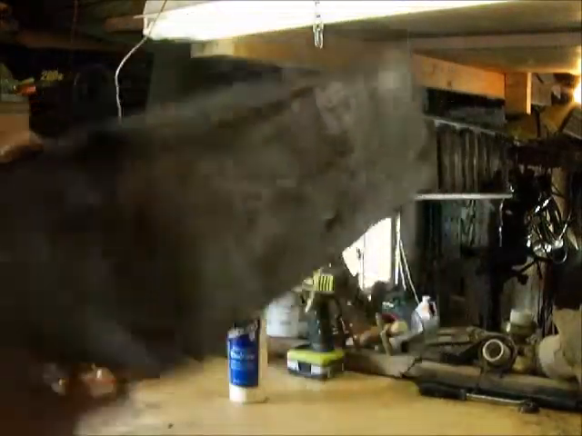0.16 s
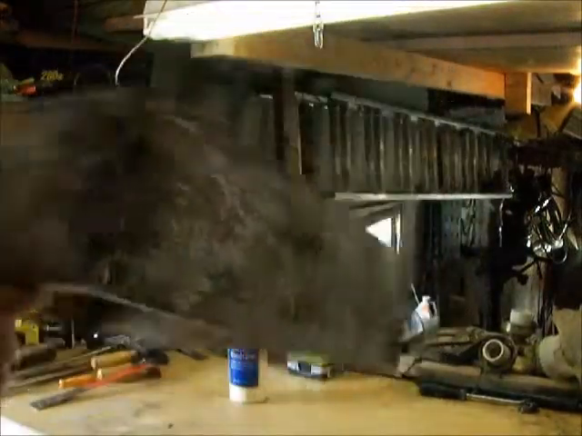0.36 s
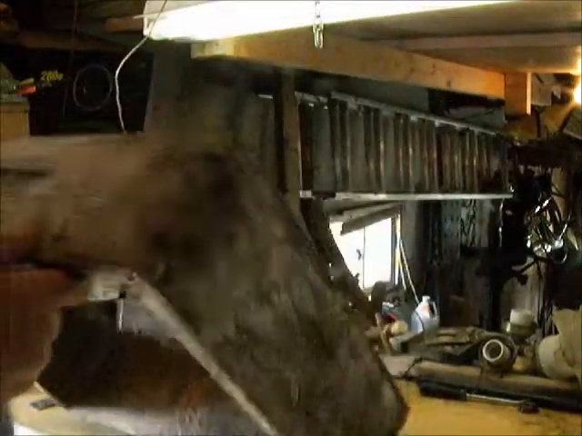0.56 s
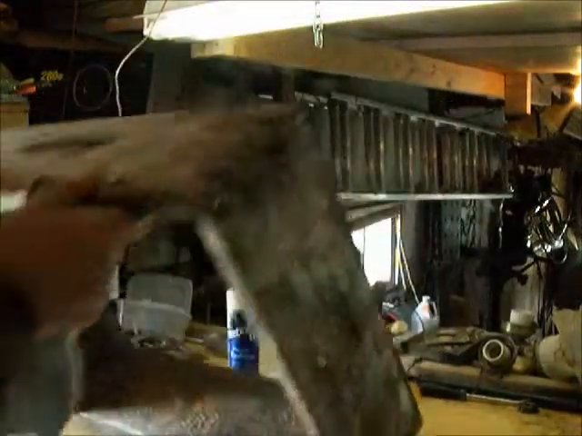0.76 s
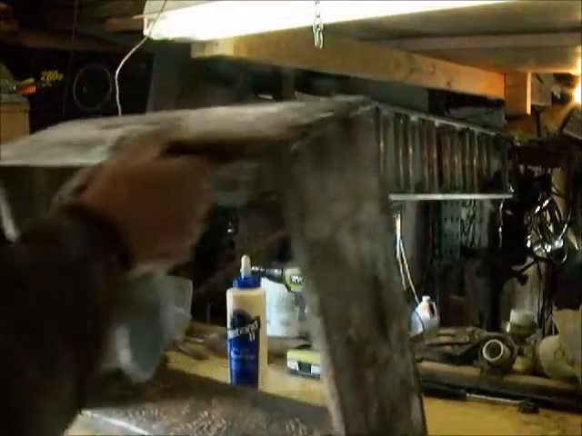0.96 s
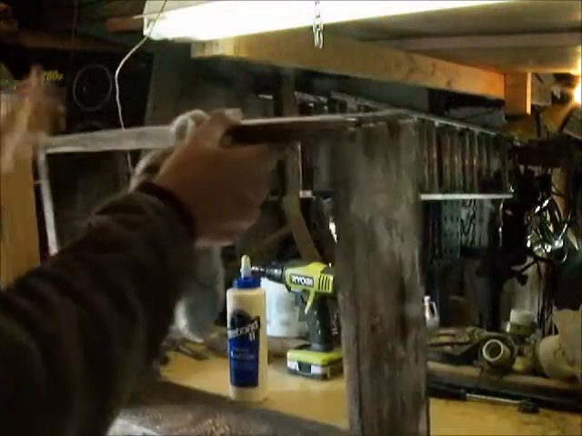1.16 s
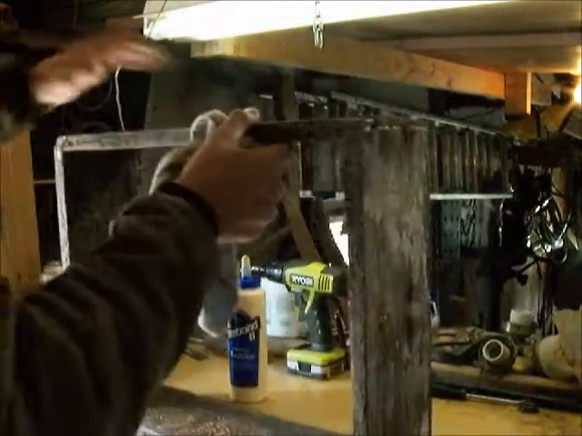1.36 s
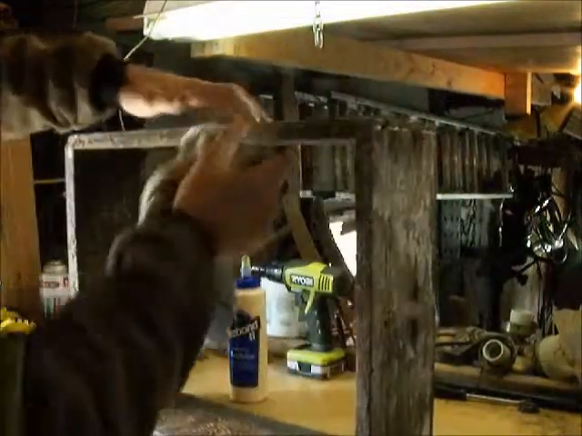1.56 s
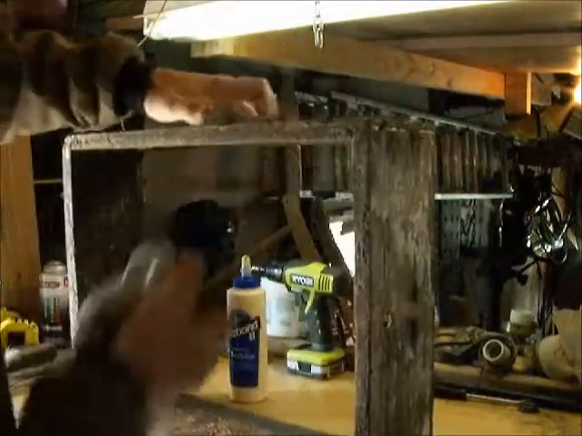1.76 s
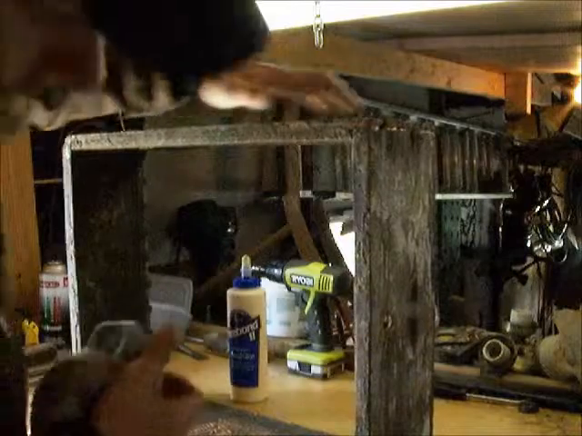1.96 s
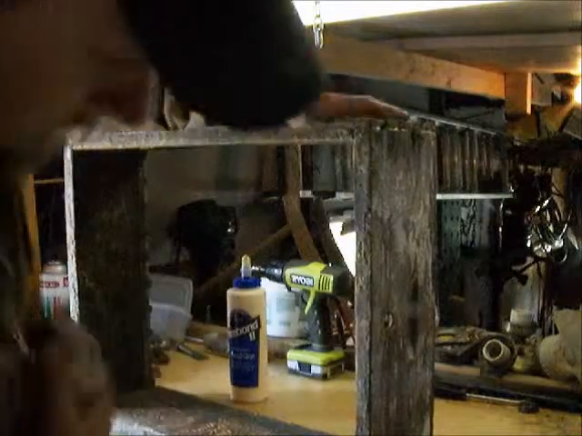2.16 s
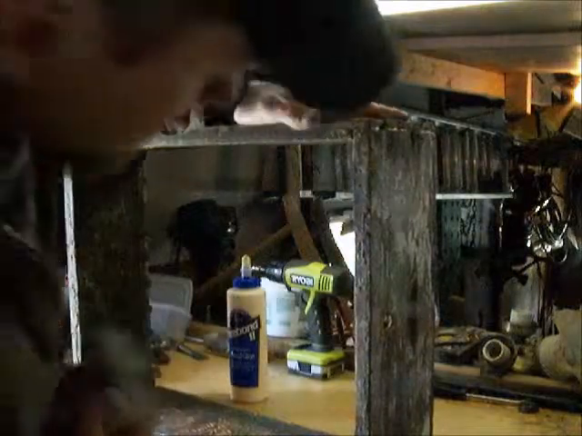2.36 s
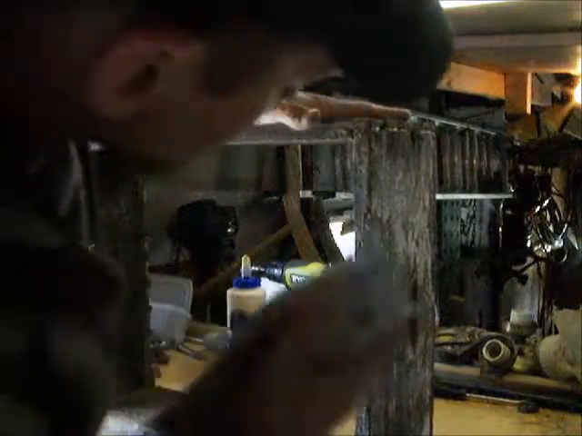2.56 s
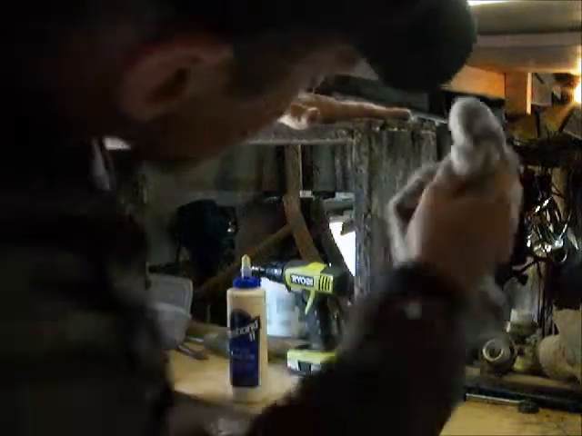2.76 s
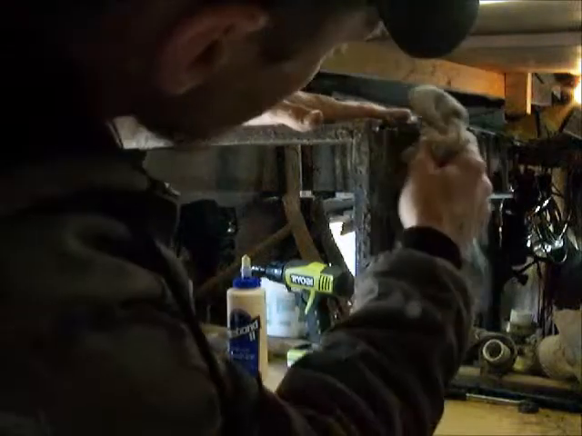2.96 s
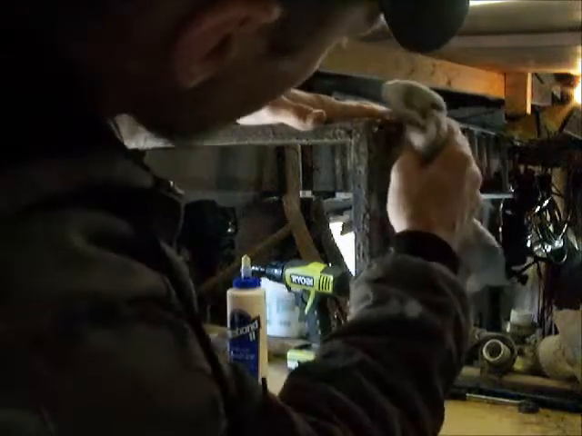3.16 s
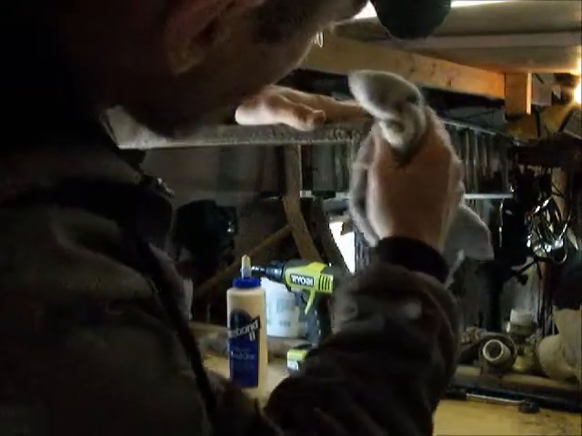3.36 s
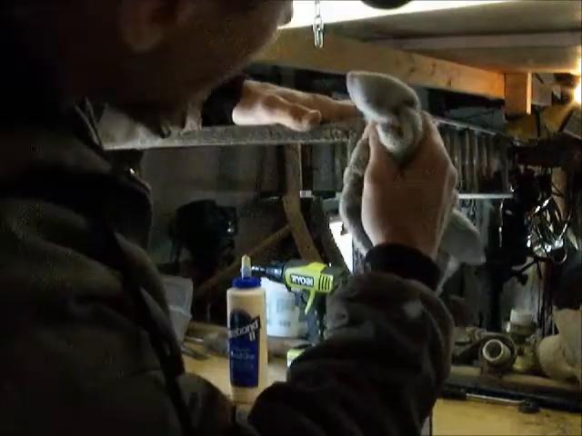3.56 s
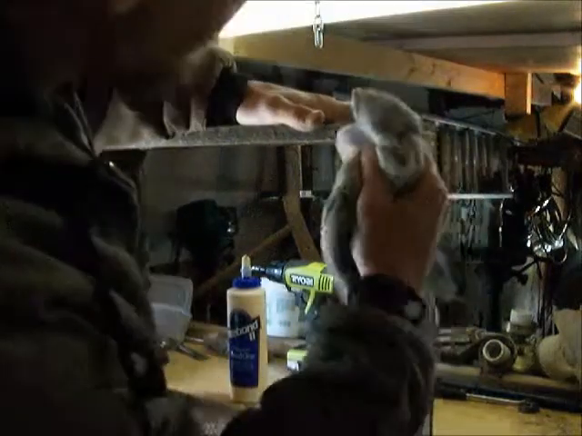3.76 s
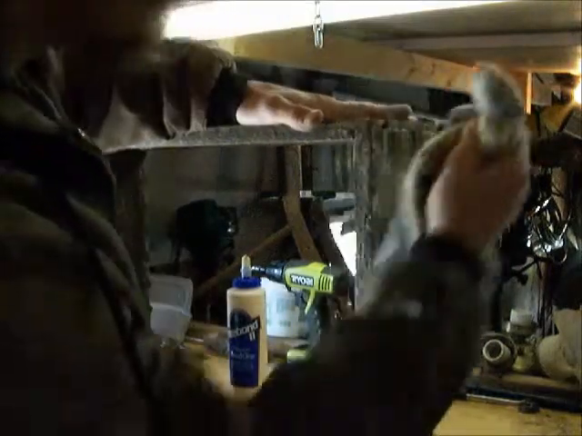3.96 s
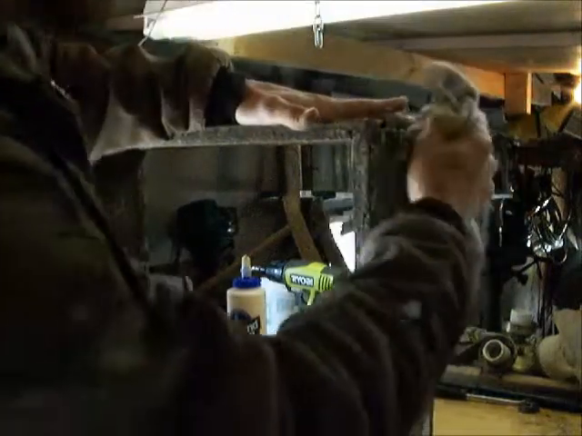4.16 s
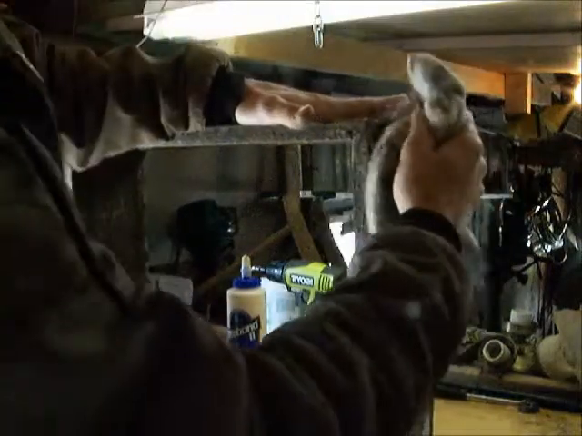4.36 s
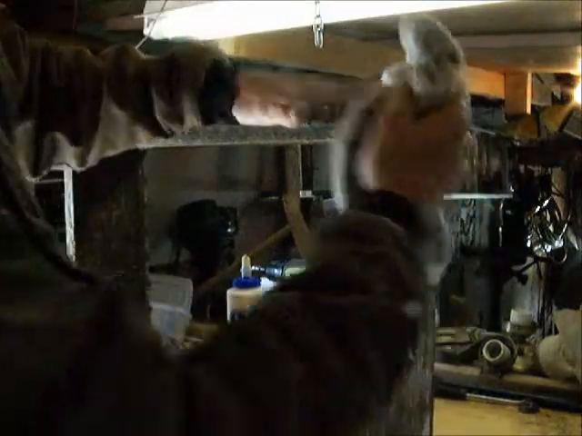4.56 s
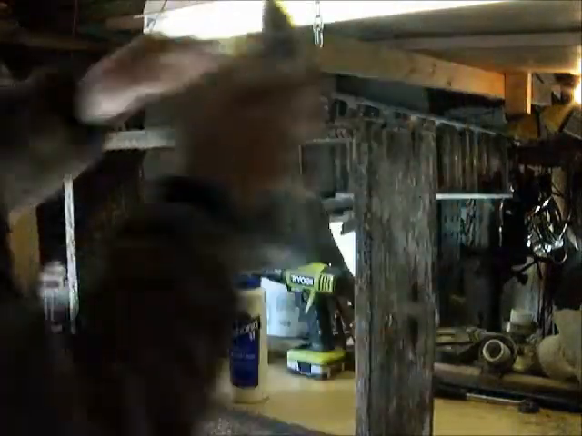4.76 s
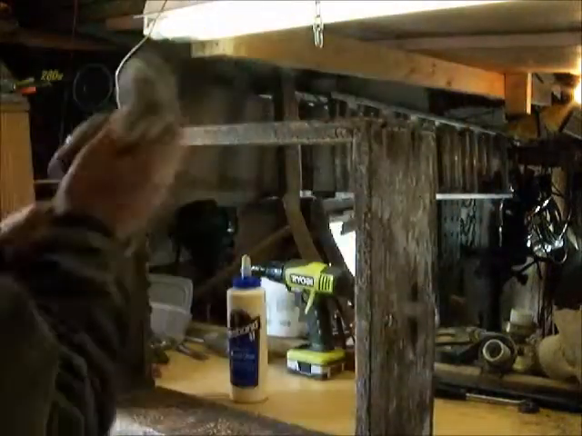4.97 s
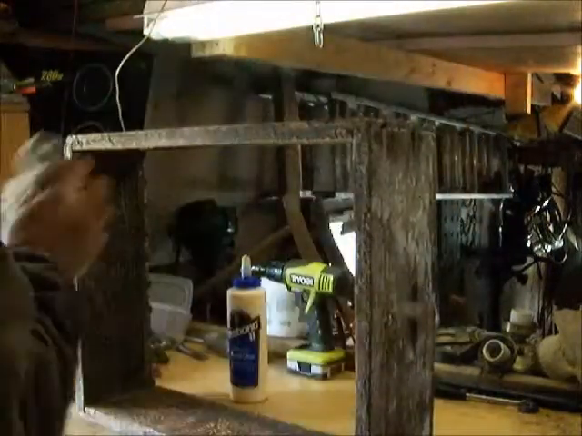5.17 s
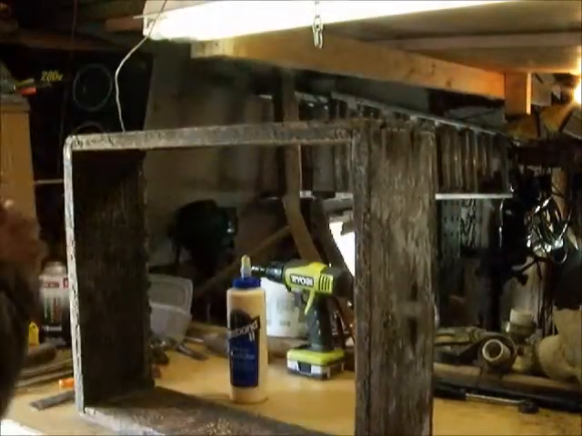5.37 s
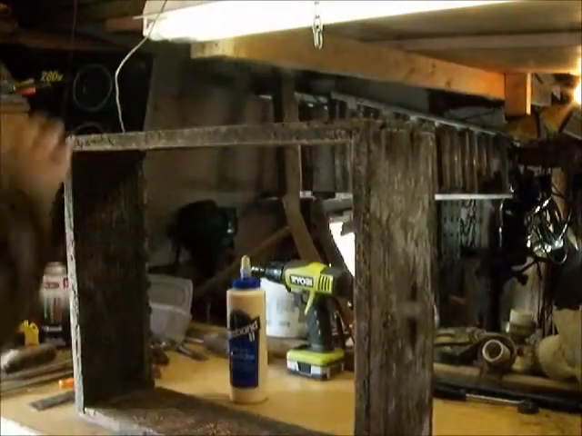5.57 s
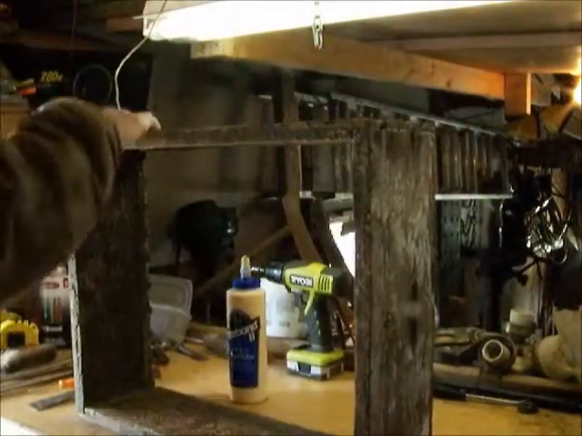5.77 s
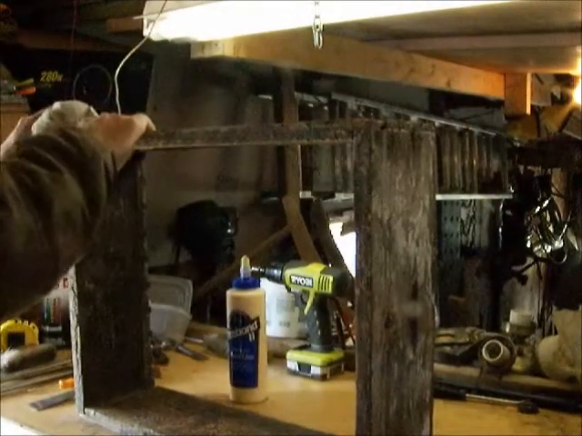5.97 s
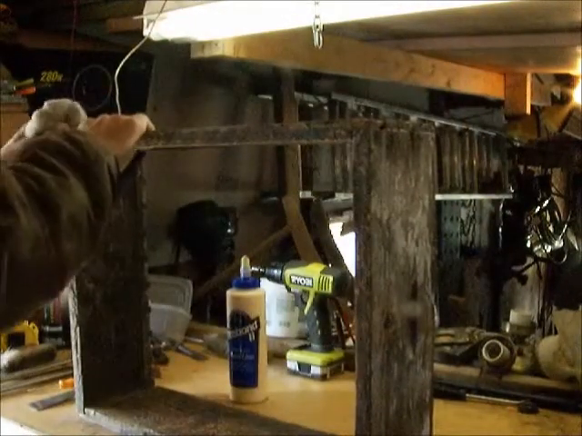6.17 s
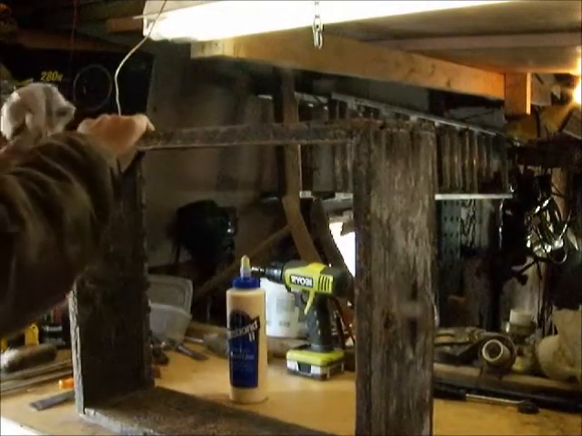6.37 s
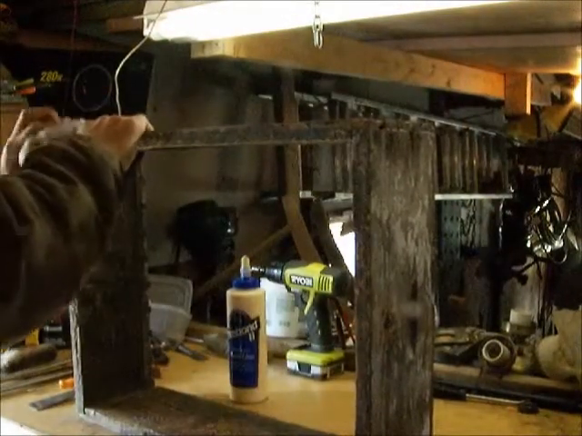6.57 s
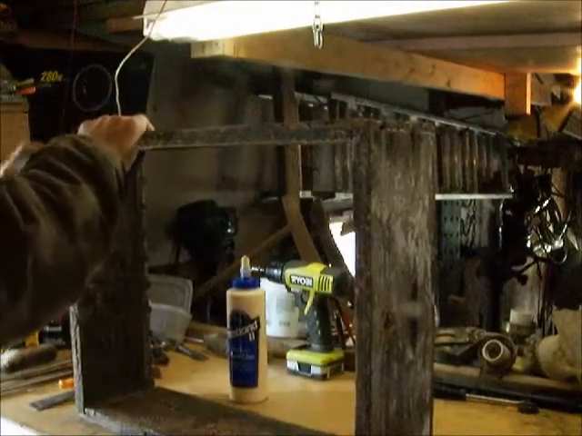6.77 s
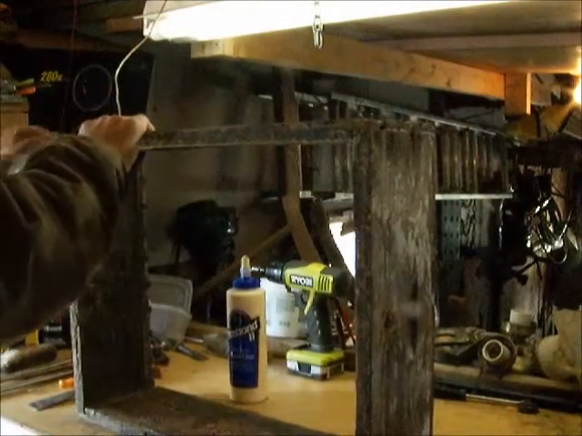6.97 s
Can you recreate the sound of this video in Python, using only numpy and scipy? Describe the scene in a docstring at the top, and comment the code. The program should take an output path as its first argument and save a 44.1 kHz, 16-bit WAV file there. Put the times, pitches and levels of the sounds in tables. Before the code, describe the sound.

Heavy knock of a weathered wood box set down on a bench, followed by dry rag wiping, small knocks, splinter ticks and quiet whirring.

```python
"""Motor chatter at the left and a brushing cloth over a garage hum; at 0.5 s a box of weathered boards
lands on a workbench. A rag then wipes its joints: random fibre catches hiss and rasp through filters, slips
squeak as wavering sines. Knocks ring box and bench modes; splinters tick and scuff as resonated clicks.
The focus motor is whine plus gear clicks in its housing; hum is sines over shaped noise.
Gain control ducks after the heavy landing and slowly comes back."""
import sys
import numpy as np
from scipy import signal
from scipy.fft import rfft, irfft, next_fast_len
from scipy.io import wavfile
from scipy.ndimage import uniform_filter1d

SR = 44100
rng = np.random.default_rng(int(sys.argv[2]) if len(sys.argv) > 2 else 0)


def master(y):
    """Save y as 16-bit WAV."""
    cut = np.clip(np.atleast_2d(y).T, -1, 1)
    pcm = np.round(cut * 32767)  # scale
    wavfile.write(sys.argv[1], SR, pcm.astype(np.int16))


N = 309185
TIME = np.arange(N) / SR

# All source levels are relative unless noted.
# Rag wipes, pressed and drawn along a joint: start t/s, end t/s, strength/dB, rasp/dB, edge bite/dB
WIPES = [(0.376, 0.393, -31.5, 7, -2.5), (0.419, 0.471, -31.5, 13, -5), (1.47, 1.493, -31.5, -2, -1),
         (2.902, 2.969, -25.5, 0.5, -8.5), (3.161, 3.277, -19, -2.5, -9.5), (3.332, 3.367, -33.5, 2, -2),
         (3.507, 3.522, -19, 1, -6.5), (3.538, 3.643, -30.5, 2.5, -9.5), (3.843, 3.978, -30, 0.5, -6.5),
         (4.106, 4.196, -29, 1, -7.5), (4.247, 4.33, -31.5, 1.5, -11), (5.919, 6.059, -31, 0.5, -4),
         (6.519, 6.656, -33, 0, -7.5)]
# Loose cloth swept by the arm: fastest at t/s, speeding up/s, slowing down/s, strength/dB, rasp/dB
SWEEPS = [(0.07, 0.21, .17, -31.5, 3), (0.678, 0.058, 0.21, -32.5, 3), (1.381, .05, 0.036, -43.5, 2),
          (1.6, 0.13, 0.1, -36.5, -4), (2.04, 0.15, 0.17, -31.5, -2.5), (2.468, 0.08, 0.046, -30, 0.5),
          (2.648, 0.099, 0.086, -25.5, 2.5), (4.531, 0.089, 0.1, -26.5, -1), (4.951, 0.21, 0.15, -32, 4),
          (5.4, 0.14, 0.31, -34, 4.5), (6.798, 0.11, 0.071, -45.5, 11)]
# Fibre hiss spectrum: f/Hz, density/dB
HISS_SPECTRUM = [(300, -37.5), (1000, -35.5), (1800, -7), (2700, -4.5), (4000, 3.5), (5300, 7), (6200, 0.5),
                 (7300, -8), (8200, -36.5)]
# Board rasp spectrum: f/Hz, density/dB
RASP_SPECTRUM = [(80, 4), (160, 7), (300, 6.5), (450, 4), (700, 3.5), (1000, 3.5), (1500, -2), (2400, -5.5),
                 (4000, -46.5)]
# Board grain resonances under the rag: f/Hz, width/Hz, level/dB
GRAIN_MODES = [(2660, 55, -9), (2980, 45, -6), (3490, 35, -2), (6320, 75, -12)]
# Panel shaken by the rag: f/Hz, width/Hz, level/dB
PANEL_MODES = [(172, 33, 0.5), (271.7, 6.2, 15), (360, 42, -3.5), (393, 7.5, 2.5), (412, 68, -5),
               (1005, 38, 4.5)]
# Rag squeaks: start t/s, end t/s, f/Hz, level/dB
SQUEAKS = [(2.845, 2.885, 4550, -33), (5.915, 6.015, 2025, -38.5)]
# Blows on the box: t/s, level/dB, contact bandwidth/Hz, passed on to the bench/dB
BLOWS = [(0.4857, -3.5, 430, -11.5), (0.4933, -15, 800, -22), (0.511, -10.5, 716, -8), (0.532, -17, 445, 2),
         (0.634, -12.5, 75, 4), (0.71, -16.5, 65, 6), (1.474, -27.5, 506, 9), (1.702, -28.5, 195, 1),
         (1.92, -30, 218, 0), (2.03, -25, 109, -14), (4.263, -29.5, 400, -13), (5.053, -27, 426, 6),
         (5.137, -33, 607, -4), (5.679, -23.5, 265, 4), (5.695, -13, 207, -7)]
# Box modes: f/Hz, level/dB, t60/s
BOX_MODES = [(88.6, -10, 0.29), (119, 2, 0.093), (158.5, -12.5, 0.44), (174.2, -7, 0.26),
             (212.2, -9.5, 0.31), (238.7, -20.5, 0.35), (267, -15, 0.24), (294.4, -21, 0.17),
             (333.6, -10.5, 0.19), (356.7, -12.5, 0.22), (398.7, -11.5, 0.17), (430.4, -7, 0.12),
             (486, -15, .18), (538, -15, 0.25), (603, -13, 0.1), (833, -25.5, 0.23), (853, -22.5, 0.055),
             (1026, -10, 0.027)]
# Workbench modes: f/Hz, level/dB, t60/s
BENCH_MODES = [(35.6, -9, 0.61), (52.9, -10, 0.33), (66.5, -3, 0.19)]
# Splinter ticks: t/s, level/dB
TICKS = [(0.4676, -7.5), (0.6518, -26.5), (0.7373, -25), (0.813, -28), (1.454, -30.5), (2.325, -31.5),
         (3.1252, -26.5), (3.137, -28), (4.1955, -27), (4.706, -22), (6.132, -38), (6.377, -30.5),
         (6.699, -36), (6.78, -38), (6.8498, -31), (6.98, -39)]
# Splinter resonances: f/Hz, width/Hz, level/dB
SPLINTER_MODES = [(1980, 2100, -3), (3300, 2170, 3), (4430, 1470, 8.5), (5600, 500, 10), (6800, 320, -2)]
# Scuffs on rough edges: t/s, level/dB, t60/s, passed into the board/dB
SCUFFS = [(0.461, -28, 0.3, 9), (0.469, -6, 0.0076, -17), (0.487, -14, 0.046, 9.5), (4.246, -25, 0.056, 0),
          (4.257, -6.5, 0.051, -1), (4.265, -17.5, 0.035, -11), (4.282, -25, 0.36, -0.5),
          (5.676, -24, 0.078, 6.5), (5.726, -23.5, 0.078, 0.5), (6.036, -43, 0.035, 6),
          (6.052, -34, 0.076, 6), (6.648, -23.5, 0.047, 0.5)]
# Rough edge resonances: f/Hz, width/Hz, level/dB
EDGE_MODES = [(2886, 100, -4), (4610, 1400, -3), (5420, 800, 3), (6960, 570, -10.5)]
# Resonances of the board behind the edge: f/Hz, width/Hz, level/dB
BOARD_MODES = [(1007, 28, 1), (1593, 300, -9), (2500, 990, -5), (3600, 1700, -10)]
# Focus motor runs: start t/s, end t/s, level/dB
FOCUS_RUNS = [(0.008, 0.039, -34), (0.062, 0.087, -31.5), (0.105, 0.117, -29), (0.221, 0.28, -33.5),
              (0.309, 0.375, -30), (1.119, 1.143, -41), (1.283, 1.284, -39), (1.861, 1.926, -37),
              (2.035, 2.139, -39), (2.519, 2.57, -31), (2.689, 2.699, -27), (2.741, 2.82, -34),
              (3.242, 3.354, -34), (3.451, 3.539, -36), (3.664, 3.699, -33), (3.724, 3.811, -32),
              (3.855, 3.955, -31.5), (3.993, 4.103, -35), (4.235, 4.246, -34.5), (4.418, 4.471, -32),
              (4.826, 4.858, -33.5), (4.938, 4.992, -31.5), (5.045, 5.15, -33), (5.399, 5.446, -35),
              (5.543, 5.631, -33.5), (5.868, 5.882, -30.5), (5.922, 5.993, -35.5), (6.042, 6.055, -30.5),
              (6.163, 6.19, -36.5), (6.302, 6.337, -33), (6.413, 6.47, -30), (6.5, 6.622, -34),
              (6.78, 6.8, -37.5), (6.944, 6.972, -28)]
# Motor housing resonances: f/Hz, width/Hz, level/dB
HOUSING_MODES = [(545.4, 64, -1), (652.5, 82, -2), (706, 97, -5.5), (855, 121, -5.5), (1076, 130, -17),
                 (1225, 110, -14.5), (1690, 55, -15.5), (2010, 48, -16), (2156, 91, -17)]
# Motor whine partials: f/Hz, level/dB
MOTOR_WHINE = [(635, -2.5), (834, -11.5), (1270, -18.5), (2110, -25.5)]
# Machine hum partials: f/Hz, median rms level/dB
HUM = [(91.5, -46), (118.4, -48.5), (180, -64)]
# Garage air spectrum: f/Hz, density/dB
AIR_SPECTRUM = [(20, -1), (45, -1), (70, 0.5), (105, -3), (150, -9.5), (250, -13.5), (450, -19), (900, -23),
                (1300, -21), (2500, -26), (7500, -36.5)]
# Left-right correlation of the air: f/Hz, correlation/1
AIR_CORRELATION = [(60, 0.76), (130, 0.52), (350, 0.79), (800, 0.13), (2500, 0.033)]
# Muffling of the left microphone: f/Hz, gain/dB
LEFT_PORT = [(100, -4), (300, -1), (600, 0.5), (1200, 1.5), (2200, -15), (3500, -25), (5500, -22.5),
             (8000, -16)]

WIPE_ATTACK_S, WIPE_RELEASE_S = 0.019, 0.022
PRESS_DB_PER_S = 4.5  # the hand leans in as it goes
HOLD_DB, HOLD_RASP_DB = -45.5, -1  # rag shifting in the resting hand
LOOSE_BITE_DB = -10  # edge bite of loose cloth
REBOUND_S, REBOUND_LOSS_DB, REBOUND_MAX_DB = 0.06, 6, -27
SCUFF_ATTACK_S = 0.0024
SURGE_PERIOD_S, SURGE_DEPTH_DB, SETTLE_S = 0.027, 3.5, 0.025
TWITCH_GAP_S, TWITCH_S = 0.065, 0.022  # mean start spacing, mean length
TWITCH_MAX_DB, TWITCH_SPREAD_DB = -35, 2.0
GARAGE_T60_S = 0.34
CUTOFF_HZ = 7900


def from_db(db):
    """Decibels to amplitude gain."""
    return 10 ** (np.asarray(db) / 20)


def rms_one(x):
    """Scale to unit rms."""
    return x / np.sqrt(np.mean(x ** 2) + 1e-20)


def per_bin(points):
    """Interpolate a table over log frequency at every Fourier bin."""
    hz, value = np.transpose(points)
    bins_hz = np.fft.rfftfreq(next_fast_len(N), 1 / SR)
    return np.interp(np.log(bins_hz + 1), np.log(hz), value)


def shape(x, gain):
    """Filter by a gain per Fourier bin."""
    size = next_fast_len(N)
    return irfft(rfft(x, size) * gain, size)[..., :N]


def colour(x, spectrum):
    """Filter by a table of f/Hz, gain/dB."""
    return shape(x, from_db(per_bin(spectrum)))


def drift(rate_hz):
    """Random drift, rms 1: noise through two equal poles at rate_hz, run at SR / 20."""
    r = np.exp(-40 * np.pi * rate_hz / SR)
    noise = rng.standard_normal(N // 20 + 3002)
    slow = signal.lfilter([1], [1, -2 * r, r * r], noise)[3000:]  # drop the settling
    return np.interp(np.arange(N) / 20, np.arange(len(slow)), rms_one(slow))


def resonate(x, modes):
    """Parallel two-pole resonances (f/Hz, width/Hz, level/dB) of alternating sign."""
    out = 0
    for k, (hz, width_hz, db) in enumerate(modes):
        r = np.exp(-np.pi * width_hz / SR)
        poles = [1, -2 * r * np.cos(2 * np.pi * hz / SR), r * r]
        gain = (-1) ** k * from_db(db) * (1 - r * r) / 2
        out = out + gain * signal.lfilter([1, 0, -1], poles, x + 1e-18)
    return out


def ring(pushes, modes, scatter_db):
    """Every push excites every decaying mode (f/Hz, level/dB, t60/s) with its own random strength."""
    strengths = from_db(scatter_db * rng.standard_normal((len(pushes), len(modes))))
    out = 0
    for k, (force, (hz, db, t60_s)) in enumerate(zip(strengths.T @ pushes, modes)):
        r = np.exp(-np.log(1000) / (t60_s * SR))
        w = 2 * np.pi * hz / SR
        poles = [1, -2 * r * np.cos(w), r * r]
        out = out + (-1) ** k * from_db(db) * signal.lfilter([0, np.sin(w)], poles, force + 1e-18)
    return out


def dying(start_s, t60_s):
    """Envelope that jumps to 1 and decays exponentially."""
    age_s = TIME - start_s
    return (age_s >= 0) * np.exp(-np.log(1000) * np.clip(age_s / t60_s, 0, 10))


def catches(per_s, spread_db):
    """Fibres catch and let go: random clicks of uneven size and sign, rms 1."""
    sizes = from_db(spread_db * np.minimum(rng.exponential(1, N), 5)) * rng.choice([-1, 1], N)
    hits = rng.random(N) < per_s / SR
    return rms_one(sizes * hits / np.sqrt(per_s))  # density leaves the power unchanged


def rag():
    """A firmer stroke catches more fibres; they hiss, and shake the boards under them."""
    stroke_db, rough_db, bite_db = cloth_contact()
    per_s = 7000 * from_db(0.5 * (stroke_db + 30.5))
    grip = from_db(1.1 * drift(20))  # the rough surface makes the pressure flutter
    fibres = catches(per_s, spread_db=1.0)
    hiss = rms_one(colour(fibres, HISS_SPECTRUM) + resonate(fibres, GRAIN_MODES))
    edge_catches = catches(per_s / 3, spread_db=2.5)
    bite = from_db(bite_db) * rms_one(resonate(edge_catches, [(2400, 2800, -8.5), (3100, 1170, -2.5)]))
    rasp_db = -43 + 0.75 * (stroke_db + 29) + rough_db  # less steep than the hiss
    tugs = catches(per_s, spread_db=3.5)
    rasp = rms_one(colour(tugs, RASP_SPECTRUM) + from_db(0.5) * resonate(tugs, PANEL_MODES))
    return grip * (from_db(stroke_db - 3.5) * (hiss + bite) + from_db(rasp_db) * rasp)


def cloth_contact():
    """Movements add in power, which also weights rasp and bite; returns strength, rasp, bite in dB."""
    gains, rasp_db, bite_db = map(np.array, zip(*strokes()))
    power = gains ** 2
    total = power.sum(axis=0)
    return 10 * np.log10(total), rasp_db @ power / total, bite_db @ power / total


def strokes():
    """Cloth movements (gain, rasp/dB, bite/dB): wipes grip, hold and let go; sweeps swell and fade."""
    moves = [(from_db(HOLD_DB) * np.ones(N), HOLD_RASP_DB, LOOSE_BITE_DB)]
    for start_s, end_s, db, rasp_db, bite_db in WIPES:
        onset = np.minimum(TIME - start_s, 0) / WIPE_ATTACK_S
        release = np.maximum(TIME - end_s, 0) / WIPE_RELEASE_S
        contact = np.exp(onset - release)
        press_db = PRESS_DB_PER_S * (np.clip(TIME, start_s, end_s) - (start_s + end_s) / 2)
        moves.append((from_db(db + press_db) * contact, rasp_db, bite_db))
    for fastest_s, rise_s, fall_s, db, rasp_db in SWEEPS:
        away = (TIME - fastest_s) / np.where(TIME < fastest_s, rise_s, fall_s)
        swell = np.exp(-np.minimum(away ** 2 / 2, 20))
        moves.append((from_db(db) * swell, rasp_db, LOOSE_BITE_DB))
    return moves


def squeaks():
    """The cloth sticks and slips: sines of wavering pitch and level."""
    out = 0
    for start_s, end_s, hz, db in SQUEAKS:
        progress = np.clip((TIME - start_s) / (end_s - start_s), 0, 1)
        swell = np.sqrt(np.abs(np.sin(np.pi * progress)))
        level = from_db(db + 3 * drift(60))
        phase = 2 * np.pi * np.cumsum(hz + 30 * drift(120)) / SR
        out = out + level * swell * np.sin(phase)
    return out


def blows():
    """Soft pushes ring box and bench; harder contacts reach higher modes, and the box rocks back once."""
    rebounds = [(s + REBOUND_S, min(db - REBOUND_LOSS_DB, REBOUND_MAX_DB), hz, bench_db)
                for s, db, hz, bench_db in BLOWS]
    start_s, db, contact_hz, bench_db = np.vstack([BLOWS, rebounds]).T[:, :, None]
    rate = 2 * np.pi * contact_hz
    age = np.clip((TIME - start_s) * rate, 0, 50)
    pushes = from_db(db) * age * np.exp(-age) * rate / SR
    box = ring(pushes, BOX_MODES, scatter_db=4.0)
    bench = ring(pushes * from_db(bench_db), BENCH_MODES, scatter_db=8.0)
    return from_db(1.5) * (box + bench)


def splinters():
    """A tick is a sharp snap and a brief crumble; a scuff is a decaying shower of catches."""
    snaps = np.zeros(N)
    snaps[[round(s * SR) for s, db in TICKS]] = from_db([db for s, db in TICKS])
    crumble = sum(from_db(db) * dying(s, t60_s=0.029) for s, db in TICKS) * rng.choice([-1, 1], N)
    ticking = resonate(from_db(12.5) * snaps + from_db(8.0) * crumble, SPLINTER_MODES)
    shower = catches(7000, spread_db=-0.5)
    edge = board = 0
    for s, db, t60_s, board_db in SCUFFS:
        attack = np.clip((TIME - s) / SCUFF_ATTACK_S, 0, 1)
        force = from_db(db) * dying(s, t60_s) * attack
        edge = edge + force
        board = board + from_db(board_db) * force
    scuffing = resonate(edge * shower, EDGE_MODES) + resonate(board * shower, BOARD_MODES)
    return ticking + from_db(11) * scuffing


def focus_motor():
    """The lens hunts in runs and twitches; the motor whines and its gears ring the housing."""
    load = from_db(1.3 * drift(60))
    drive = uniform_filter1d(focus_drive(), size=120) * load
    gears = (drive + from_db(-44.5)) * catches(2500, spread_db=0.75)  # a faint rattle never stops
    whine = 0
    for hz, db in MOTOR_WHINE:
        phase = 2 * np.pi * np.cumsum(hz + 14 * drift(43.3)) / SR
        whine = whine + from_db(db) * np.sin(phase)
    highpass = signal.butter(2, 450, "high", fs=SR, output="sos")
    rattle = signal.sosfilt(highpass, resonate(gears, HOUSING_MODES))
    body = from_db(18) * rattle + from_db(2) * drive * whine
    far_side = from_db(8) * resonate(gears, [(689, 82, 0.003)])  # panel next to the right microphone
    return np.array([body, from_db(-20) * body + far_side])


def focus_drive():
    """Each run is a chain of surges after a short rest; twitches fill the time between runs."""
    runs, free = 0, 1
    for start_s, end_s, db in FOCUS_RUNS:
        cycle = (TIME - start_s) / SURGE_PERIOD_S
        surge_db = SURGE_DEPTH_DB * (0.5 - np.sin(np.pi * (cycle - 1 / 4)) ** 2)
        runs = runs + from_db(db + surge_db) * ((TIME > start_s) & (TIME < end_s))
        free = free * ((TIME < start_s - SETTLE_S) | (TIME > end_s))
    return runs + free * focus_twitches()


def focus_twitches():
    """Brief lens corrections at uneven intervals, each of random length and strength."""
    drive = np.zeros(N)
    chance = rng.random(size=(300, 3))
    starts_s = np.cumsum(TWITCH_GAP_S * (0.5 + chance[:, 0]))
    for start_s, (_, length, strength) in zip(starts_s, chance):
        end_s = start_s + TWITCH_S * (0.5 + length)
        below_max_db = TWITCH_SPREAD_DB * np.sqrt(12) * (strength - 1.0)  # uniform; spread is its std
        drive[int(start_s * SR):int(end_s * SR)] = from_db(TWITCH_MAX_DB + below_max_db)
    return drive


def background():
    """A machine hums with drifting level and phase over dull, partly correlated air noise."""
    mid, side = colour(rng.standard_normal((2, N)), AIR_SPECTRUM)
    alike = np.clip(per_bin(AIR_CORRELATION), 0, 1)
    common = shape(mid, np.sqrt(1 + alike))
    opposed = shape(side, np.sqrt(1 - alike)) * [[1], [-1]]
    air = rms_one(common + opposed)
    hum = 0
    for hz, db in HUM:
        level = from_db(db + 2.0 * drift(8)) * np.sqrt(2)
        hum = hum + level * np.sin(2 * np.pi * hz * TIME + 1.58 * drift(2.9))
    return from_db(-41) * air + hum


def garage(x, wet_db):
    """Direct sound plus diffuse tail; the shaded left gets more tail and later direct sound."""
    age_s = TIME[:SR // 2]
    decay = np.exp(-np.log(1000) * age_s / GARAGE_T60_S) * (age_s > 0.003)
    tail = rng.standard_normal((2, len(age_s))) * decay
    tail /= np.sqrt(np.sum(tail ** 2, axis=1, keepdims=True))
    direct = np.array([np.interp(TIME - 0.00012, TIME, x), x])
    wet = signal.fftconvolve(x[None], tail, axes=1)[:, :N]
    return direct + from_db(wet_db + np.array([[3], [-2]])) * wet


def scene():
    """The work on the box reaches a muffled left and a clear right microphone."""
    wiping = garage(rag() + squeaks(), wet_db=-5)
    knocks = garage(splinters(), wet_db=-9) + garage(blows(), wet_db=-16)
    left, right = wiping + knocks
    return np.array([colour(left, LEFT_PORT), right]) + focus_motor() + background()


def gain_control(x, threshold_db, most_db, hold_s, release_db_per_s, attack_s):
    """A loud sound pulls the gain down; it waits, then creeps back."""
    power = uniform_filter1d(np.mean(x ** 2, axis=0), size=1000)
    level_db = 10 * np.log10(power + 1e-12)
    overload = np.clip((level_db - threshold_db) / 2, 0, 1)
    charge_db = overload * (most_db + hold_s * release_db_per_s)  # overcharge makes the hold
    leak_db = release_db_per_s * TIME
    cut_db = np.minimum(np.maximum.accumulate(charge_db + leak_db) - leak_db, most_db)
    r = np.exp(-1 / (attack_s * SR))
    return x * from_db(-signal.lfilter([1 - r], [1, -r], cut_db))


def record(dry):
    """Gain control, hard clipping at full scale, then a steep cut of the top."""
    levelled = gain_control(dry, threshold_db=-11.5, most_db=7.0, hold_s=0.85,
                            release_db_per_s=9.5, attack_s=0.09)
    lowpass = signal.ellip(10, 0.3, 80, CUTOFF_HZ, fs=SR, output="sos")
    return signal.sosfilt(lowpass, np.clip(levelled, -1, 1))


dry = scene()
out = record(dry)
master(out)
```